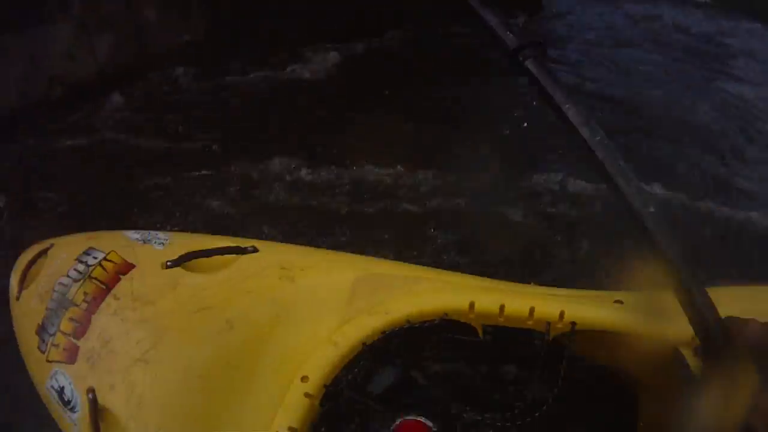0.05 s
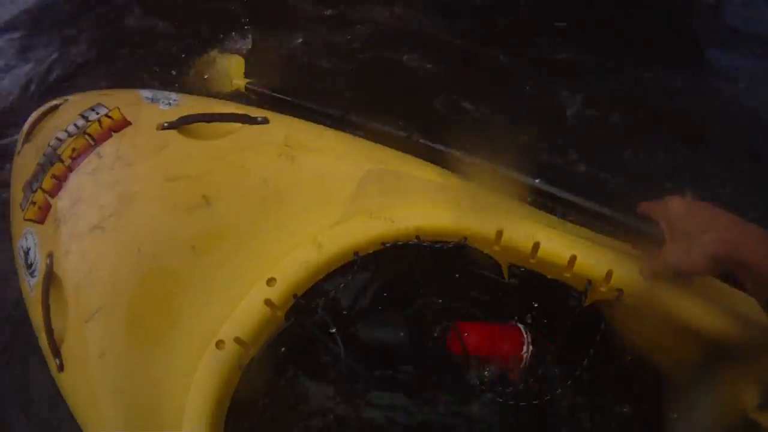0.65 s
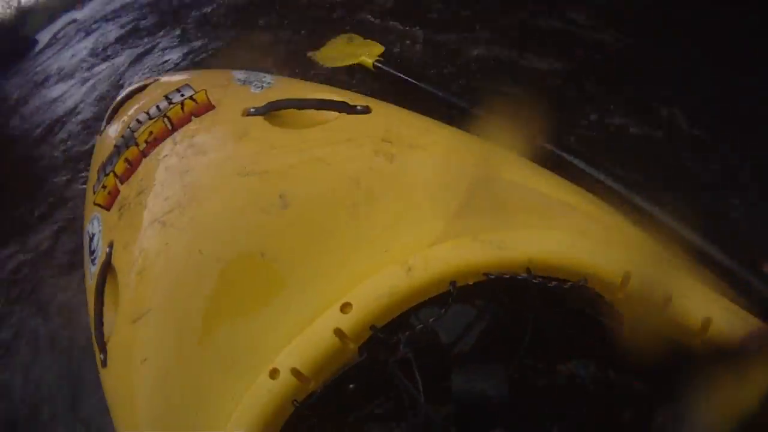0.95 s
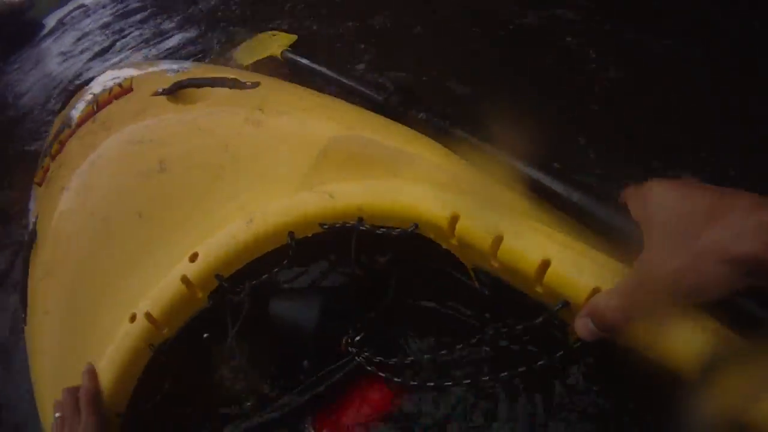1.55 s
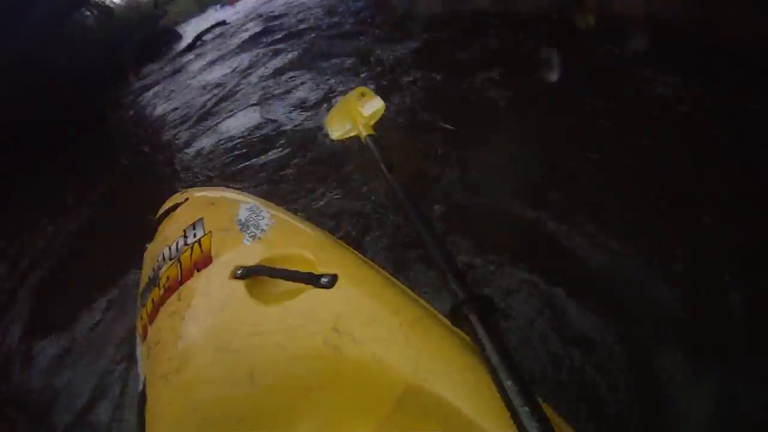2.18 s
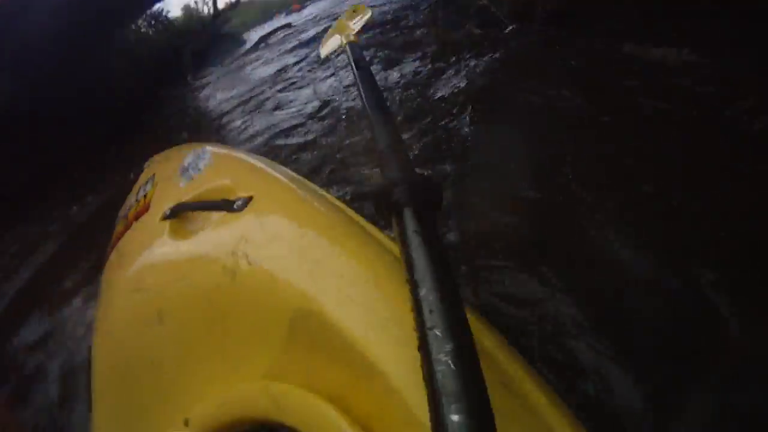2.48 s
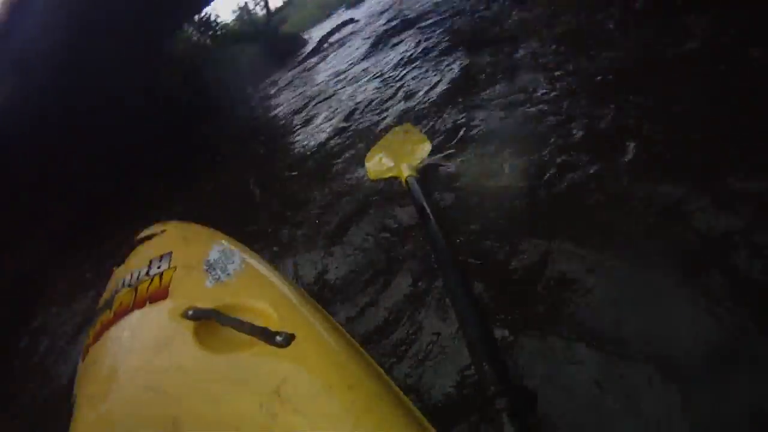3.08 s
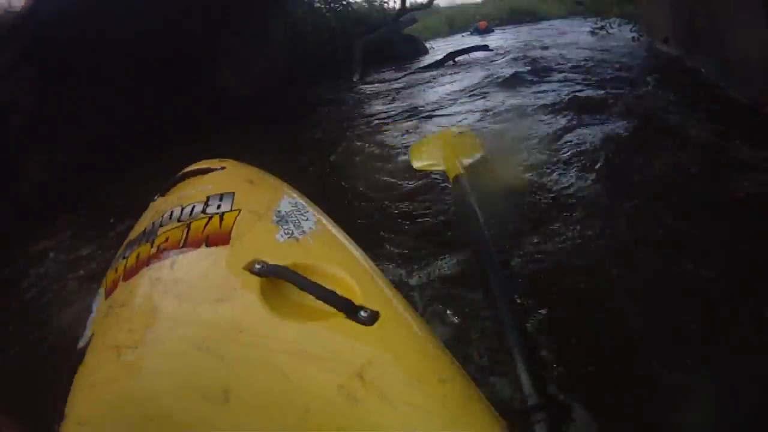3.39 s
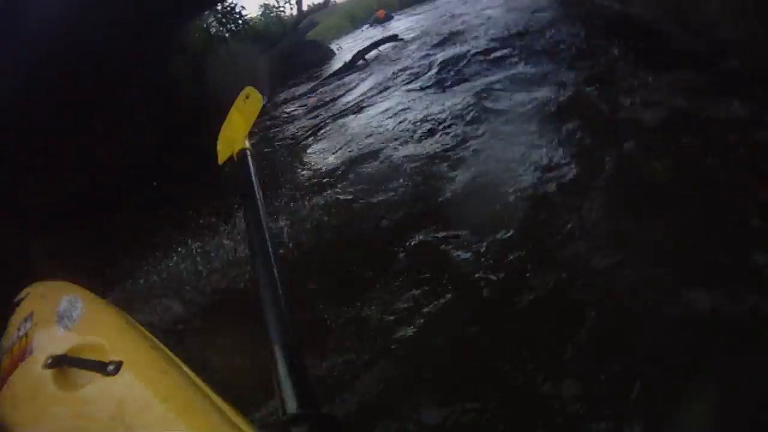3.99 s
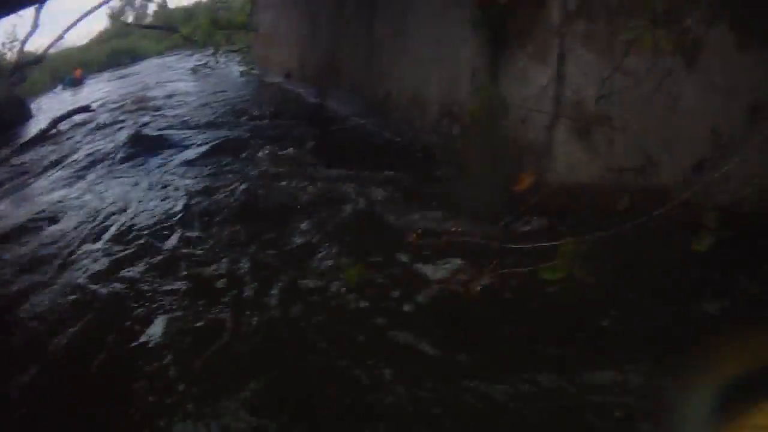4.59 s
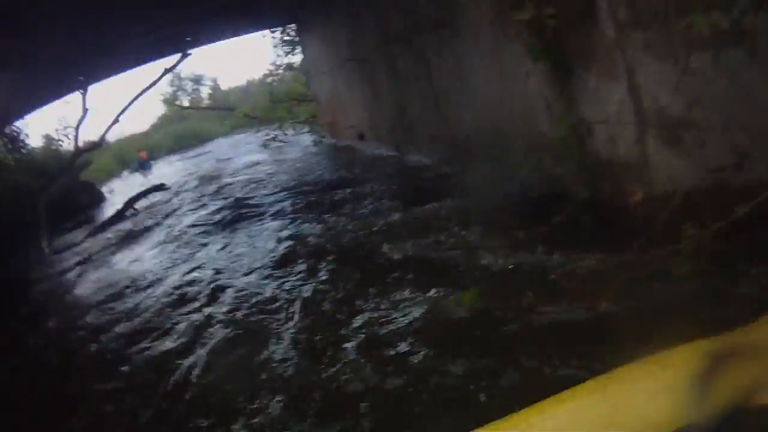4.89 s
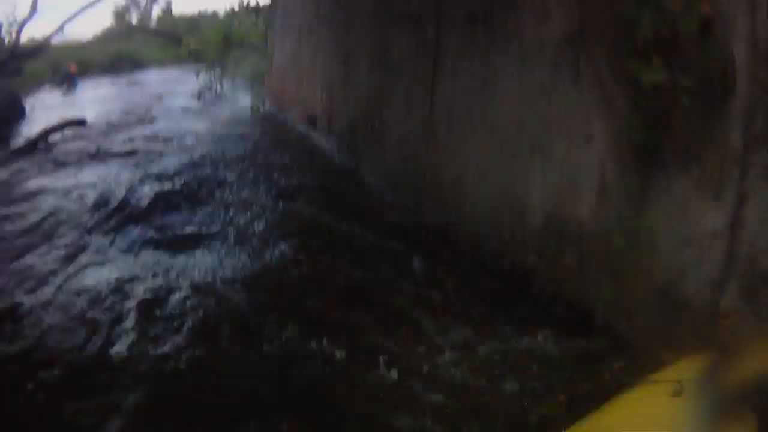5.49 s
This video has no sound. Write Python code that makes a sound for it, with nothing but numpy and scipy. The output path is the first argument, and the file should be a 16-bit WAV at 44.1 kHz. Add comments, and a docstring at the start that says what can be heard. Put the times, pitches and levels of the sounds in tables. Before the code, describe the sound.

A paddle knocks on a hollow plastic kayak and splashes lightly, with small rattles over the faint, muffled rush of a creek.

```python
"""Hollow bumps and scuffs over a muffled creek: a kayak shoves off the bank into fast water.
The paddle bounces on the plastic hull, the loudest sound; its blade splashes, gurgles and drips.
All is heard from a body-worn camera in a sealed plastic case, which colours the water with its own
resonances and sounds when gear rattles or rubs on it. Blows excite decaying modes, water is shaped
noise plus ringing bubbles, and the camera adds a faint hiss and whine."""
import sys
import numpy as np
from scipy import signal
from scipy.fft import rfft, irfft
from scipy.io import wavfile
from scipy.ndimage import uniform_filter1d

SR = 44100
rng = np.random.default_rng(int(sys.argv[2]) if len(sys.argv) > 2 else 0)


def pcm_store(signal):
    """Save signal as 16-bit PCM."""
    levels = np.round(np.clip(np.atleast_2d(signal), -1, 1) * 32767)
    wavfile.write(sys.argv[1], SR, levels.astype(np.int16).T)


N = 249165

# Paddle blows. Each row: first and last contact in seconds, contact count, relative level in dB,
# brightness in Hz, ring time factor, low-mode gain in dB.
PADDLE_BLOWS = [(2.0083, 2.016, 2, -27, 2900, 1.2, 2.5), (2.065, 2.069, 2, -42, 2200, .9, 5),
                (2.2014, 2.2012, 1, -22.5, 3445, 0.3, 4), (2.2041, 2.2041, 1, -8.8, 3800, 1.0, 1.5),
                (2.2205, 2.2234, 2, -26, 3600, 1.1, 0.5), (2.554, 2.5539, 1, -38, 2050, 1.2, -5),
                (3.0674, 3.0889, 4, -19, 3500, 1.14, 0.5), (3.107, 3.1132, 2, -46, 2400, .8, 0),
                (3.1493, 3.1535, 2, -36, 1600, 1.3, -10), (3.517, 3.5171, 1, -35, 700, 0.56, -1),
                (3.966, 3.972, 2, -40, 1720, 0.96, -8), (3.997, 3.999, 2, -46, 1400, 1.7, -6),
                (5.6273, 5.6273, 1, -33.5, 2600, 0.93, -1)]
# Hull resonances. Each row: frequency in Hz, relative level in dB, base t60 in seconds.
HULL_MODES = [(184, -20, 0.024), (490, -13, 0.03), (730, -8, 0.028), (960, -3.5, 0.033), (1215, -1, 0.023),
              (1535, -2, 0.021), (1640, 1, 0.02), (1740, -3, 0.03), (2280, -9.5, 0.033), (2600, -9, 0.017),
              (2900, -6, 0.023), (3230, -31.5, .018), (3715, -12, 0.021), (4040, -15.5, 0.023),
              (4920, -18.5, 0.018), (5290, -15.5, 0.0086), (6070, -7, .0092), (10800, -9, .003)]


def paddle_knocks():
    """The paddle strikes the plastic hull and bounces; the hollow boat rings on."""
    boom_db, boom_t60_s = -20, .14
    out, t = np.zeros(N), np.arange(SR // 2) / SR
    for *blow, ring, low_db in PADDLE_BLOWS:
        modes = shelve_modes(HULL_MODES, low_db, corner_hz=701)
        for s, db, bright_hz in bounces(*blow, flight_kept=.85, step_db=-6, bright_kept=.8):
            knock = strike(modes, bright_hz, ring, scatter_db=.6, grit=.25, grit_t60_s=.015)
            add(out, s, gain_of(db + .5) * knock)
    boom = coloured(rng.standard_normal(len(t)), lambda hz: case_band_db(hz, 1300, octaves=1.7))
    boom *= gain_of(-60 * t / boom_t60_s)
    boom /= abs(rfft(boom)).max()
    return out + gain_of(boom_db) * signal.fftconvolve(out, boom)[:N]


def bounces(first_s, last_s, count, db, bright_hz, flight_kept, step_db, bright_kept):
    """Contacts of one blow as (s, dB, brightness Hz); each rebound is weaker and duller."""
    k = np.arange(count)
    elapsed = np.cumsum(flight_kept ** k) - 1
    times_s = first_s + (last_s - first_s) * elapsed / (elapsed[-1] + 1e-9)
    return zip(times_s, db + k * step_db, bright_hz * bright_kept ** k)


def shelve_modes(modes, low_db, corner_hz):
    """Raises or lowers the modes below a corner."""
    return [(hz, db + low_db / (1 + (hz / corner_hz) ** 4), t60) for hz, db, t60 in modes]


def strike(modes, bright_hz, ring, scatter_db, grit, grit_t60_s):
    """One blow: a dry snap and a gritty push on the modes; a soft touch misses the high ones."""
    size, snap_t60_s = 8192, .006
    travel_s = .0009  # blow to microphone, for a 1 kHz bending wave
    f, t = np.fft.rfftfreq(size, 1 / SR) + 1, np.arange(size) / SR
    hz, db, t60 = np.transpose(modes)[:, :, None]
    detune, strength = rng.standard_normal((2, len(modes), 1))  # each blow lands on another spot
    hz = hz * (1 + .008 * detune)
    q = hz * t60 * ring * np.pi / np.log(1000)
    mode_power = gain_of(db + scatter_db * strength) ** 2 / (1 + (q * (f / hz - hz / f)) ** 2)
    power = mode_power.sum(0) / (1 + (f / bright_hz) ** 6)
    cepstrum = irfft(np.log(power + 1e-12)) * (np.arange(size) < size // 2)  # causal ringing
    lag_rad = 4 * np.pi * travel_s * np.sqrt(1000 * f)  # treble outruns bass in plastic
    body = irfft(np.exp(rfft(cepstrum) - 1j * lag_rad))
    scrape = rng.standard_normal(size) * gain_of(-60 * t / grit_t60_s)
    body += grit * signal.fftconvolve(body, scrape / np.linalg.norm(scrape))[:size]
    snap = np.diff(rng.standard_normal(size + 1)) * gain_of(-60 * t / snap_t60_s)
    snap_gain = gain_of(-28) * (bright_hz / 6000) ** 2
    return 5 * (body / np.linalg.norm(body) + snap_gain * snap / np.linalg.norm(snap))


# Fitting blows. Each row: start in seconds, level in dB, brightness in Hz, ring time factor,
# pitch factor, low-mode gain in dB.
FITTING_BLOWS = [(2.2514, -23.5, 7000, 1.2, .88, -7), (5.6041, -24.3, 9050, 1, 1, 2)]
# Fitting resonances. Each row: base frequency in Hz, relative level in dB, base t60 in seconds.
FITTING_MODES = [(900, -7, .012), (1750, 0, .018), (3500, -1.5, .016), (4300, -0.5, .018), (4810, 2, 0.011),
                 (7025, -9.5, 0.009), (8800, -13, 0.0068), (11400, -16, 0.0028)]


def fitting_clacks():
    """A hard fitting meets the case in one clean contact and rings briefly."""
    out = np.zeros(N)
    for s, db, bright_hz, ring, pitch, low_db in FITTING_BLOWS:
        modes = shelve_modes(FITTING_MODES, low_db, corner_hz=2300)
        modes = [(hz * pitch, mode_db, t60) for hz, mode_db, t60 in modes]
        clack = strike(modes, bright_hz, ring, scatter_db=.5, grit=.45, grit_t60_s=.01)
        add(out, s, gain_of(db) * clack)
    return out


# Gear blows. Each row: first and last contact in seconds, contact count, relative level in dB,
# brightness in Hz, low-mode gain in dB.
GEAR_BLOWS = [(2.019, 2.019, 1, -27.5, 5530, 3.5), (2.0282, 2.0282, 1, -30, 9000, 1),
              (2.0393, 2.0393, 1, -30, 7500, 2), (2.077, 2.077, 1, -25, 7500, -0.5),
              (2.103, 2.103, 1, -28, 5800, 0.5), (2.173, 2.173, 1, -32, 4440, -1),
              (2.1966, 2.1965, 1, -32, 7850, 0), (2.454, 2.454, 1, -46, 9000, -30),
              (3.3707, 3.380, 3, -27.5, 6200, 4), (5.174, 5.174, 1, -46.5, 4000, -3),
              (5.4742, 5.4745, 1, -47, 3000, -2), (5.5085, 5.5085, 1, -42.5, 1600, 10),
              (5.519, 5.518, 1, -39.5, 4200, -9), (5.539, 5.542, 2, -36, 3400, 8),
              (5.5625, 5.5655, 2, -39, 8000, -3), (5.569, 5.571, 2, -34.5, 8000, -4),
              (5.5955, 5.5955, 1, -39, 3000, 3), (5.6007, 5.6007, 1, -35, 6000, 0),
              (5.6123, 5.614, 2, -31.5, 6500, -2), (5.6275, 5.6275, 1, -35, 7500, -8)]


def gear_rattle():
    """Gear taps and bounces on the case."""
    out = np.zeros(N)
    for *blow, low_db in GEAR_BLOWS:
        for s, db, bright_hz in bounces(*blow, flight_kept=1, step_db=-4, bright_kept=.88):
            add(out, s, gain_of(db - 1.6) * case_tap(bright_hz, low_db))
    return out


# Struck case resonances. Each row: frequency in Hz, relative level in dB, base t60 in seconds.
CASE_MODES = [(210, -8.5, .02), (457, -8, 0.013), (673, -1, 0.055), (824, 5, 0.026), (1680, 3, 0.019),
              (2136, -2.5, 0.014), (2500, -1.5, 0.012), (3190, 2, 0.021), (3880, -2, .012),
              (4280, -2, 0.015), (4810, -3, 0.021), (6220, -9.5, .01), (7290, -10.5, 0.0025),
              (11000, -14, .0025)]


def case_tap(bright_hz, low_db):
    """One contact with the case; light ones leave out low modes, heavy ones ring longer."""
    ring = gain_of(.27 * max(low_db, 0))
    modes = shelve_modes(CASE_MODES, low_db, corner_hz=1796 - 70 * min(low_db, 0))
    return strike(modes, bright_hz, ring, scatter_db=1.5, grit=1.3, grit_t60_s=.009)


# Boat against bank. Each row: start in seconds, level in dB, brightness in Hz.
BANK_BLOWS = [(.111, -46, 700), (0.5256, -37.5, 6500), (0.9226, -40.5, 2250), (1.0358, -39.3, 2350),
              (1.138, -50, 2500), (1.260, -44.5, 1500), (1.3428, -45.5, 1310), (1.576, -50, 496)]
# Boat resonances through air and case. Each row: frequency in Hz, relative level in dB,
# base t60 in seconds.
BOAT_MODES = [(518, -11, 0.035), (770, -1.5, .035), (940, -5.5, 0.035), (1607, -0.5, 0.04),
              (2400, -8.5, 0.025), (3140, -5, 0.024), (4232, 6.5, 0.044), (6100, -15, 0.0035)]


def boat_bumps():
    """The boat bumps and scuffs on the bank: gritty, hollow knocks."""
    out = np.zeros(N)
    for s, db, bright_hz in BANK_BLOWS:
        bump = strike(BOAT_MODES, bright_hz, ring=.93, scatter_db=1, grit=1.6, grit_t60_s=.03)
        add(out, s, gain_of(db) * bump)
    return out


# Sudden noisy bursts: gear scrapes, the hollow tail of a bump, and water slaps.
# Each row: peak time in seconds, t60 in seconds, level in dB, centre in Hz, half width in octaves.
NOISE_BURSTS = [(.528, 0.11, -47.5, 418, 1.6), (2.057, 0.07, -47.5, 1400, 1.5),
                (2.193, 0.056, -45.5, 6500, 4.5), (2.616, 0.11, -57.5, 1284, 0.92),
                (3.199, 0.18, -54, 520, 0.8)]
# Soft noisy swells: swirling water, gear rubbing, and the hollow ring after knocks.
# Each row: as for the bursts.
NOISE_SWELLS = [(.56, .25, -62, 300, .8), (.629, 0.5, -64, 1670, .35), (.622, 0.13, -61.5, 4600, .33),
                (.845, 0.37, -67.5, 450, 0.84), (.96, 0.25, -63.5, 890, 1.2), (1.15, 0.17, -64, 694, 0.51),
                (1.261, 0.084, -63, 2980, .6), (1.599, .08, -62.5, 453, 0.82), (1.82, 0.49, -62, 457, 0.55),
                (2.005, 0.16, -62, 599, 0.87), (2.175, 0.077, -53.5, 2760, 1.1),
                (2.178, .09, -52, 300, 1.3), (2.469, .4, -62, 1400, 1.6), (3.30, 0.13, -59, 2030, 0.5),
                (3.363, .09, -52.5, 1320, 1.4), (3.445, 0.26, -54.5, 2020, 0.58),
                (4.166, 0.08, -58, 3180, 0.65), (4.405, .12, -65, 4000, 0.65),
                (5.235, 0.24, -63, 2220, 0.93), (5.45, 0.4, -68, 223, 1.0), (5.539, 0.11, -53.5, 900, 1.6),
                (5.609, 0.09, -47, 1750, 0.97)]


def bursts_and_swells():
    """Water, rubbing gear and the tails of knocks: bands of grainy noise that rise and die away."""
    lead_s, burst_rise_s, swell_rise_share = 1 / 8, .0029, .14
    out, t = np.zeros(N), np.arange(16384) / SR - lead_s
    bursts = [(s, burst_rise_s, t60, *rest) for s, t60, *rest in NOISE_BURSTS]
    swells = [(s, swell_rise_share * t60, t60, *rest) for s, t60, *rest in NOISE_SWELLS]
    for s, rise_s, t60, db, centre_hz, octaves in bursts + swells:
        noise = patter(len(t), per_s=2000, spread_db=-1.5, grain_gain=.74)
        band = coloured(noise, lambda hz: case_band_db(hz, centre_hz, octaves))
        envelope = np.where(t < 0, np.exp(-(t / rise_s) ** 2), gain_of(-60 * abs(t) / t60))
        add(out, s - lead_s, gain_of(db) * envelope * band)
    return out


# Single bubbles. Each row: start in seconds, level in dB, starting pitch in Hz, t60 in seconds.
BUBBLE_PLOPS = [(0.112, -48, 570, .023), (.1525, -44.5, 3240, 0.02), (.709, -53.5, 3200, 0.024),
                (.949, -54, 3450, 0.027), (1.883, -50, 504, .066), (2.057, -41, 563, .035),
                (2.169, -40.5, 480, 0.039), (4.733, -50, 660, 0.038), (5.438, -51, 950, 0.023),
                (5.457, -51, 700, .02)]


def bubbles():
    """A bubble rings unevenly as it wobbles, and rises in pitch as it nears the surface."""
    out, t = np.zeros(N), np.arange(SR // 4) / SR
    for s, db, hz, t60 in BUBBLE_PLOPS:
        wobble = coloured(rng.standard_normal(len(t)), lambda f: -20 * np.log10(1 + (5 * f / hz) ** 2))
        pitch_hz = hz * (1 + .15 * np.minimum(t / t60, 1) + .06 * wobble)
        envelope = gain_of(db - 60 * t / t60) * (1 - np.exp(-t * hz))
        add(out, s, envelope * np.sin(2 * np.pi * np.cumsum(pitch_hz) / SR))
    return out


def drips():
    """Drops run off the raised blade and tick on the water."""
    return pings(2.27, 4.45, per_s=16, db=-64, spread_db=5, centre_hz=7400, octaves=.12, t60_s=.009)


# Creek level as boat and camera turn. Each row: time in seconds, relative slosh and rush levels in dB.
CREEK_LEVELS = [(0.0, -74.5, -69), (0.44, -77, -70), (0.77, -73, -66.5), (1.45, -74, -72.5),
                (1.79, -75, -72), (2.03, -63.5, -65.5), (2.17, -68, -62.5), (2.45, -70.5, -73),
                (2.82, -72, -66), (3.16, -70, -67.5), (3.35, -64.5, -65.5), (3.52, -71.5, -69.5),
                (3.74, -75, -68.5), (3.96, -70.5, -66), (4.47, -75, -69.5), (5.21, -71, -70.5),
                (5.48, -69, -69), (5.65, -62.5, -66.5)]
# Slosh and rush spectra. Each row: frequency in Hz, relative density in dB.
SLOSH_SPECTRUM = [(90, -2.5), (200, -3.5), (400, -3), (700, -1), (1100, -4), (1600, -18.5), (3000, -23)]
RUSH_SPECTRUM = [(500, -25), (1000, -16.5), (1600, -4), (2700, -4.5), (4400, -5.5), (5400, -9.5),
                 (8000, -13), (12000, -39.5)]


def creek():
    """Low slosh against the boat and the higher rush of the current."""
    times_s, slosh_db, rush_db = np.transpose(CREEK_LEVELS)
    t = np.arange(N) / SR
    slosh = patter(N, per_s=230, spread_db=0, grain_gain=.61)
    slosh = coloured(slosh, lambda hz: spectrum_db(SLOSH_SPECTRUM, hz) + case_db(hz))
    rush = patter(N, per_s=150, spread_db=7.5, grain_gain=.6)
    rush = coloured(rush, lambda hz: spectrum_db(RUSH_SPECTRUM, hz) + case_db(hz))
    return (gain_of(np.interp(t, times_s, slosh_db) + 2) * churn(slosh, patchy_db=2)
            + gain_of(np.interp(t, times_s, rush_db) + .51) * churn(rush, patchy_db=1.77))


def laps():
    """Wavelets fold on the hull with a rising plip, more often and louder in strong slosh."""
    base_per_s, above_slosh_db, spread_db, centre_hz, octaves, t60_s = 14, 10, 4.5, 747, .7, .018
    out, t = np.zeros(N), np.arange(4096) / SR
    times_s, slosh_db, _ = np.transpose(CREEK_LEVELS)
    chances = rng.random((300, 4))
    for when, luck, size, pitch in chances:
        s = when * N / SR
        db = np.interp(s, times_s, slosh_db)
        per_s = base_per_s * gain_of(db - np.median(slosh_db))
        if luck < per_s * N / SR / len(chances):
            hz = centre_hz * 2 ** (octaves * (2 * pitch - 1))
            turns = np.cumsum(hz * (1 + .2 * np.minimum(t / t60_s, 1))) / SR
            peak_db = db + above_slosh_db + spread_db * (2 * size - 1)
            add(out, s, gain_of(peak_db - 60 * t / t60_s) * np.sin(2 * np.pi * turns))
    return out


def gear_touches():
    """Loose gear touches the case at random, more often and harder in rough water."""
    base_per_s, base_db, spread_db = 4, -51, 4
    out = np.zeros(N)
    times_s, slosh_db, _ = np.transpose(CREEK_LEVELS)
    chances = rng.random((64, 3))
    for when, luck, size in chances:
        s = when * N / SR
        rough_db = .45 * (np.interp(s, times_s, slosh_db) - np.median(slosh_db))
        db = base_db + rough_db + spread_db * (2 * size - 1.5)
        touch = gain_of(db) * case_tap(bright_hz=3200, low_db=0)
        if luck < base_per_s * gain_of(rough_db) * N / SR / len(chances):
            add(out, s, touch)
    return out


def fizz():
    """Small bubbles burst near the case's treble resonance, louder where the rush is strong."""
    times_s, _, rush_db = np.transpose(CREEK_LEVELS)
    swell_db = np.interp(np.arange(N) / SR, times_s, rush_db - np.median(rush_db))
    bursts = pings(0, N / SR, per_s=14, db=-61, spread_db=4, centre_hz=4330, octaves=.05, t60_s=.03)
    return gain_of(swell_db) * bursts


# Body jolts. Each row: peak time in seconds, peak level in dB, frequency in Hz.
BODY_JOLTS = [(1.927, -58, 26), (2.177, -36, 54.7), (2.189, -33, 26.4), (2.634, -48.5, 24.8),
              (3.073, -51, 75), (3.467, -54, 25), (3.519, -43.5, 171), (4.227, -58, 160), (4.908, -58, 150),
              (5.543, -47.5, 140), (5.552, -39, 23.8)]
# Handling rumble. Each row: frequency in Hz, relative density in dB.
RUMBLE_SPECTRUM = [(8, -1), (22, 4.5), (40, -10.5), (70, -32.5), (130, -31), (400, -36.5)]


def handling():
    """The body's movements rumble in the case; a jolt flexes it through one slow swing."""
    out = gain_of(-71) * coloured(rng.standard_normal(N), lambda hz: spectrum_db(RUMBLE_SPECTRUM, hz))
    lead_s = 1 / 8
    t = np.arange(-lead_s, lead_s, 1 / SR)
    for s, db, hz in BODY_JOLTS:
        phase_sq = (np.pi * hz * t) ** 2
        add(out, s - lead_s, gain_of(db) * (1 - 2 * phase_sq) * np.exp(-phase_sq))
    return out


# Electronic hiss. Each row: frequency in Hz, relative density in dB.
HISS_SPECTRUM = [(100, -16.5), (3000, -17.5), (8300, 2), (12000, -2), (15500, 3)]


def camera_hiss():
    """Steady hiss of the electronics, partly shared by left and right."""
    level_db, correlation = -72, .25
    shared, left, right = (coloured(white, lambda hz: spectrum_db(HISS_SPECTRUM, hz))
                           for white in rng.standard_normal((3, N)))
    hiss = np.sqrt(correlation) * shared + np.sqrt(1 - correlation) * np.array([left, right])
    return gain_of(level_db) * hiss


def camera_whine():
    """A thin tone that dips once every picture frame, with a pulsing treble buzz and sizzle."""
    whine_hz, frame_hz, buzz_hz, surge_hz = 11988, 30, 100, 10
    t = np.arange(N) / SR
    dip = .75 * ((t * frame_hz) % 1 < .3)
    tone = gain_of([[-81.5], [-78]]) * unit_rms((1 - dip) * np.sin(2 * np.pi * whine_hz * t))
    pulses = (t * buzz_hz) % 1 < .3
    surge = (t * surge_hz + .35) % 1 < .25
    band = coloured(rng.standard_normal(N), lambda hz: -20 * np.log10(1 + ((hz - 8880) / 290) ** 2))
    buzz = unit_rms(pulses * (1 + surge) * band)
    sizzle = coloured(rng.standard_normal(N), lambda hz: -10 * np.log10(1 + (7500 / (hz + 1)) ** 6))
    return tone + gain_of(-81.5) * buzz + gain_of(-72.5) * surge * sizzle


# Case transmission. Each row: centre in Hz, width in Hz, gain in dB.
CASE_BANDS = [(761, 380, 8.5), (1170, 17, 7), (1620, 274, 7.5), (2350, 194, 2), (3227, 130, 7),
              (4326, 190, 10), (7970, 210, -4.5)]


def case_db(hz):
    """Gain of the case: its resonances, and walls that shut out the highest treble."""
    resonances_db = sum(db / (1 + (2 * (hz - f) / width) ** 2) for f, width, db in CASE_BANDS)
    return resonances_db - (hz / 8800) ** 4


def case_band_db(hz, centre_hz, octaves):
    """A rounded band heard through the case."""
    return case_db(hz) - 4.44 * (np.log2((hz + 1) / centre_hz) / octaves) ** 2


def patter(count, per_s, spread_db, grain_gain):
    """Smooth noise plus separate grains."""
    grains = (rng.random(count) < per_s / SR) * rng.choice([-1, 1], count)
    grains = grains * gain_of(spread_db * np.minimum(rng.exponential(1, count), 2))
    return unit_rms(rng.standard_normal(count) + grain_gain * unit_rms(grains))


def churn(x, patchy_db):
    """Breaks steady noise into drifting patches of time and pitch."""
    spectra = signal.stft(x, nperseg=512)[2]
    patches = uniform_filter1d(rng.standard_normal(spectra.shape[::-1]), 6, axis=0)
    patches = unit_rms(uniform_filter1d(patches, 10, axis=1))
    return unit_rms(signal.istft(spectra * gain_of(patchy_db * patches.T), nperseg=512)[1][:N])


def pings(first_s, last_s, per_s, db, spread_db, centre_hz, octaves, t60_s):
    """Tiny ringing drops or bubbles, scattered at random between two times."""
    out, t = np.zeros(N), np.arange(2048) / SR
    for when, size, pitch in rng.random((round(per_s * (last_s - first_s)), 3)):
        hz = centre_hz * 2 ** (octaves * (2 * pitch - 1))
        envelope = gain_of(db + spread_db * (2 * size - 1) - 60 * t / t60_s)
        add(out, first_s + when * (last_s - first_s), envelope * np.sin(2 * np.pi * hz * t))
    return out


def gain_of(db):
    """Decibels to amplitude."""
    return 10 ** (np.asarray(db) / 20)


def unit_rms(x):
    """Scales to rms 1."""
    return x / np.sqrt(np.mean(x ** 2) + 1e-20)


def spectrum_db(points, hz):
    """Interpolates a spectrum on a log-frequency axis."""
    f, db = np.transpose(points)
    return np.interp(np.log(hz + 1), np.log(f + 1), db)


def coloured(x, db_at):
    """Filters x by the gain curve db_at(hz); rms 1."""
    hz = np.fft.rfftfreq(len(x), 1 / SR)
    return unit_rms(irfft(rfft(x) * gain_of(db_at(hz)), len(x)))


def add(mix, s, sound):
    """Mixes a sound in at s seconds."""
    start = max(round(s * SR), 0)
    part = mix[start:start + len(sound)]
    part += sound[:len(part)]


def scene():
    """Everything reaches both channels alike through the sealed case."""
    blows = paddle_knocks() + boat_bumps() + gear_rattle() + gear_touches() + fitting_clacks()
    inside = blows + bursts_and_swells() + bubbles() + laps() + creek() + handling() + drips() + fizz()
    return np.array([inside, inside])


def record(dry):
    """The camera's own hiss and whine, then the band limit."""
    cutoff_hz = 15400
    lowpass = signal.firwin(255, cutoff_hz, window=("kaiser", 8), fs=SR)
    return signal.oaconvolve(dry + camera_hiss() + camera_whine(), lowpass[None], "same", axes=1)


dry = scene()
out = record(dry)
pcm_store(out)
```